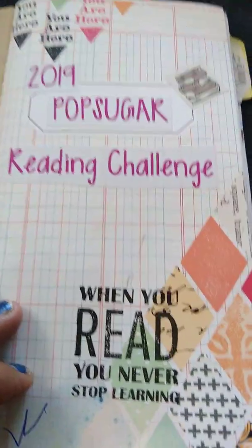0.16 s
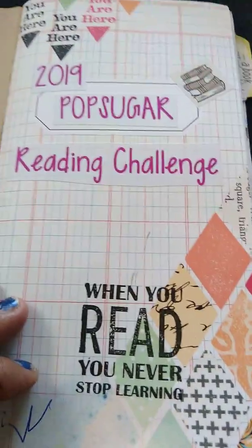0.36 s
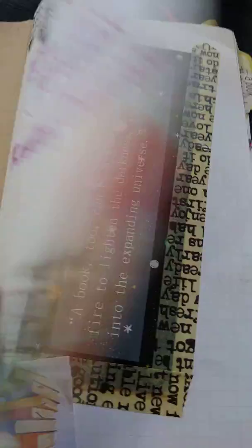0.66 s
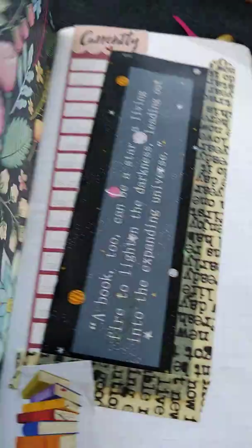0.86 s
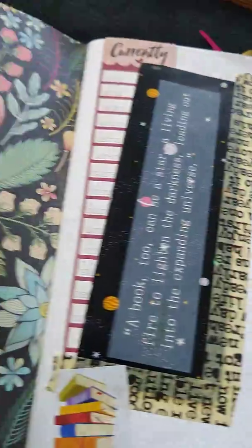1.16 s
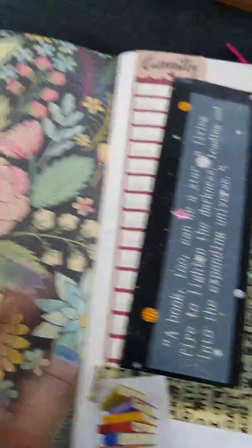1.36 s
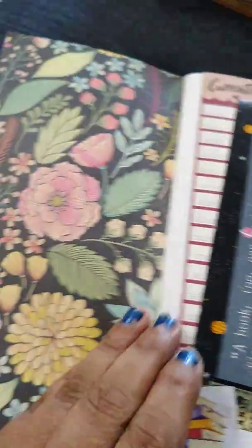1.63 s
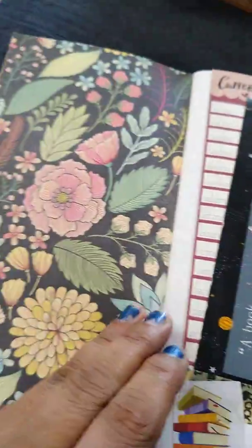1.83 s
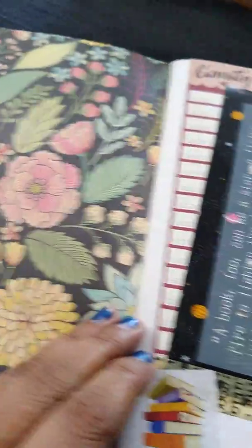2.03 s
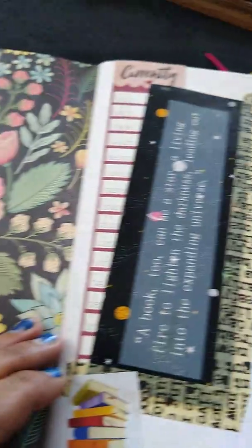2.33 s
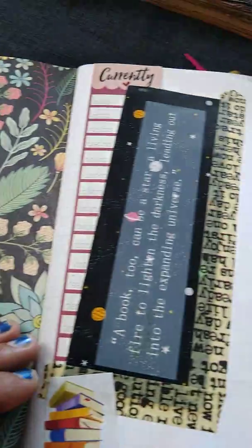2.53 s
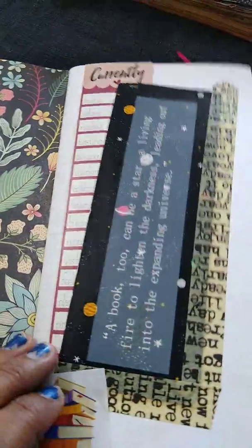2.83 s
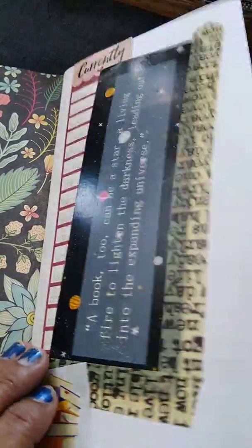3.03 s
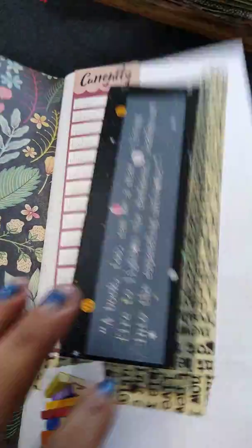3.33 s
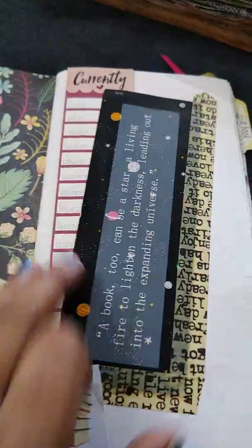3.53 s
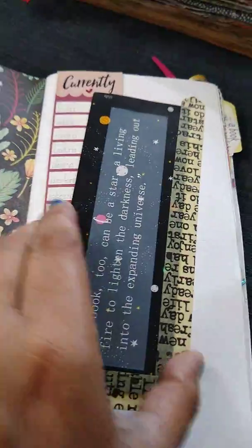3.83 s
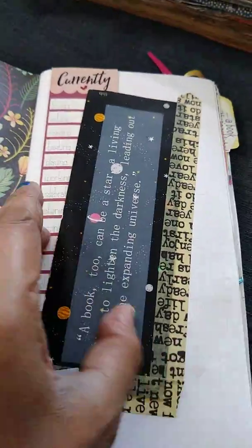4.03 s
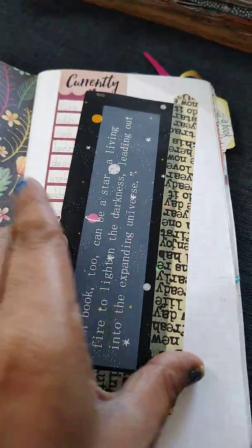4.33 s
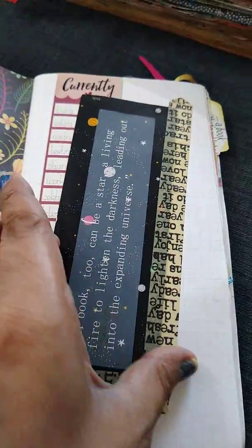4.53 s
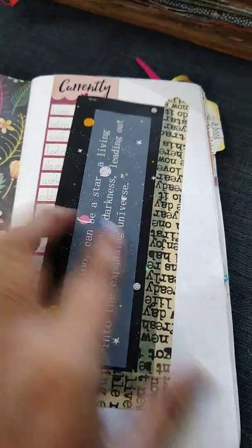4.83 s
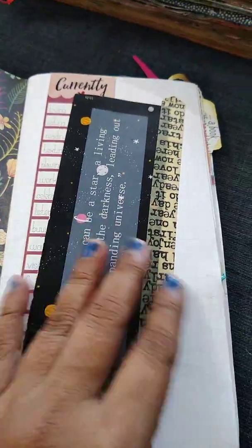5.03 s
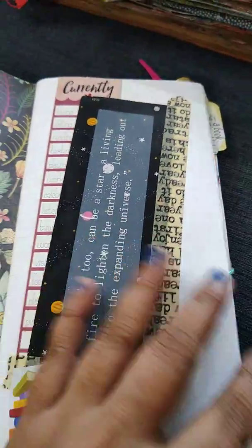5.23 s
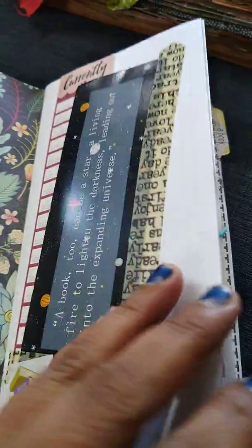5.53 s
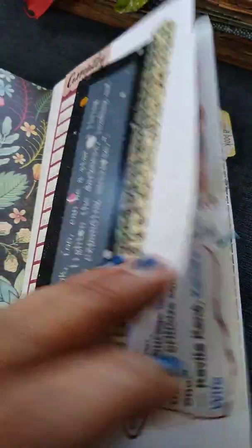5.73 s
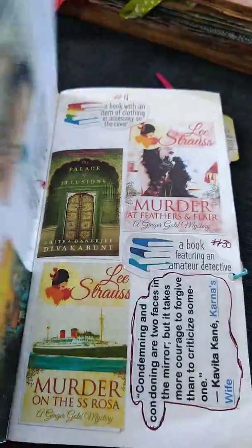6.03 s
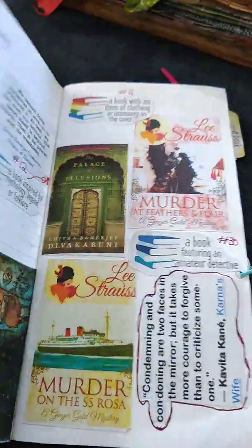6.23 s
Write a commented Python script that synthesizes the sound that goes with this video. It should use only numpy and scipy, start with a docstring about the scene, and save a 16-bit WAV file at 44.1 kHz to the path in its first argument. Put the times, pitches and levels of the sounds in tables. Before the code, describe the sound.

A hand opens and leafs through a heavy paper book in a quiet room. First come grainy scrapes, flexing sheets and several loud page slaps; then near stillness with distant hoarse bird calls. More rustling follows, with crisp edge snaps and stuttering palm friction, then airy, hissing slides and a final page turn. Recorded very close, with short reflections, low rumble and steady faint hiss; the two channels are opposite in polarity.

```python
"""A thick paper journal is opened and leafed through by hand, close to a camera in a quiet room.
Pages slide with a grainy hiss of friction noise, flex, and flap down: scrape, slap and ringing stack.
Skin and page edges rub in stick-slip noise, and a palm smooths the sheet in small jerks.
A hoarse bird, a gliding tone with a noisy edge, calls faintly far away over low rumble and steady hiss.
The two microphone channels have opposite polarity."""
import sys
import numpy as np
from scipy import signal
from scipy.fft import rfft, irfft, next_fast_len
from scipy.io import wavfile
from scipy.ndimage import uniform_filter1d, map_coordinates

SR = 44100
rng = np.random.default_rng(int(sys.argv[2]) if len(sys.argv) > 2 else 0)


def transcribe(signal):
    """Save signal, clipped to [-1, 1], as a 16-bit WAV file at the path in sys.argv[1]."""
    frames = np.atleast_2d(signal).T
    limited = np.clip(frames, -1, 1)
    pcm = np.round(limited * 32767).astype(np.int16)
    wavfile.write(sys.argv[1], SR, pcm)


N = 281269
T = np.arange(N) / SR  # seconds
# All levels in the tables are relative: the mix and the microphone come after them.


def amp(db):
    """Decibels to gain."""
    return 10 ** (np.asarray(db) / 20)


def unit(x):
    """Scale to rms 1."""
    return x / np.sqrt(np.mean(x ** 2) + 1e-20)


def along(points, hz):
    """Read (Hz, value) points on a log frequency axis."""
    f, v = np.transpose(points)
    return np.interp(np.log(hz + 1), np.log(f + 1), v)


def wobble(rate):
    """A smooth random curve, rate knots a second."""
    knots = rng.standard_normal(int(N * rate / SR) + 4)
    return map_coordinates(knots, [T * rate])


def filtered(x, response):
    """x times a complex response of frequency."""
    n = x.shape[-1]
    m = next_fast_len(n + 4096)
    return irfft(rfft(x, m) * response(np.fft.rfftfreq(m, 1 / SR)), m)[..., :n]


def coloured(x, spectrum):
    """x shaped by (Hz, dB) points, at rms 1."""
    return unit(filtered(x, lambda hz: amp(along(spectrum, hz))))


def halves(texture):
    """Near and far sides share a texture but no simultaneous detail: one is shifted by half the length."""
    return np.array([texture, np.roll(texture, N // 2)])


def stroke(start, rise, hold, decay):
    """One movement of the hand: it gathers speed, keeps it, and dies away to a tenth in each decay time."""
    attack = np.sin(np.pi / 2 * np.clip((T - start) / rise, 0, 1)) ** 1.6
    return attack * amp(-20 * np.maximum(T - start - rise - hold, 0) / decay)


SNAGS_PER_S, SNAG_DB = 46, 2.5  # typical snagging rate of the sheet, and the swell before it frees itself


def friction(spectrum, rate, grain_share, spread_db, flutter_db):
    """Fibres catch and let go, about rate times a second, over a bed of countless smaller slips."""
    sizes = amp(spread_db * np.minimum(rng.exponential(size=N), 4))
    slips = (rng.random(N) < rate / SR) * rng.choice([-1, 1], N) * sizes
    bed = rng.standard_normal(N)
    drive = np.sqrt(grain_share) * unit(slips) + np.sqrt(1 - grain_share) * bed
    # drag builds up, then suddenly lets go
    snag = np.cumsum(SNAGS_PER_S * np.exp(0.75 * wobble(40))) / SR % 1
    # the hand never presses evenly
    pressure_db = flutter_db * wobble(70) + wobble(22.05) + SNAG_DB * snag ** 2
    return coloured(drive * amp(pressure_db), spectrum)


def bending(x, depth_db, size):
    """As a sheet bends, its resonances drift: patches of gain in time and frequency, size bins high."""
    z = signal.stft(x, nperseg=512)[2]
    field = uniform_filter1d(rng.standard_normal(z.shape), size=size, axis=0)
    field = uniform_filter1d(field, size=18, axis=1)
    return unit(signal.istft(z * amp(depth_db * unit(field)), nperseg=512)[1][:N])


# level of the room's rumble: time_s, level_db
RUMBLE_LEVEL = [(0, -55), (.25, -64), (.6, -51), (1.8, -56.5), (2.45, -51.5), (2.8, -59), (4.3, -51.5),
                (4.55, -46), (4.8, -49), (5.7, -54.5), (6.15, -55), (6.38, -48)]
# spectra of the rumble and of the steady hiss: pitch_hz, level_db (per Hz)
RUMBLE_SPECTRUM = [(20, -24), (50, -10.5), (85, 3), (135, 3.5), (220, -12), (420, -32.5), (1000, -48),
                   (3000, -78.5)]
HISS_SPECTRUM = [(60, -12), (220, -18.5), (420, -21.5), (850, -25), (1700, -28.5), (2900, -30.5),
                 (6000, -36.5), (15500, -39.5)]


def room_tone():
    """Low rumble of the room, wandering a little, with a faint steady hiss, from the two sides."""
    level_db = np.interp(T, *np.transpose(RUMBLE_LEVEL)) + 2.2 * wobble(9)
    rumble = amp(level_db) * halves(coloured(rng.standard_normal(N), RUMBLE_SPECTRUM))
    hiss = halves(coloured(rng.standard_normal(N), HISS_SPECTRUM))
    return rumble + amp(-61.5) * hiss


# calls of the far bird: start_s, length_s, first_pitch_hz, last_pitch_hz, level_db, hoarseness (0-1)
BIRD_CALLS = [(1.9, 0.34, 1680, 1495, -52.5, 0.65), (2.54, 0.3, 1566, 1495, -48.5, 0.54),
              (4.103, 0.39, 1517, 1544, -44.5, 0.65), (4.493, 0.25, 1560, 1573, -49, 0.17)]
SETTLE_S = 0.11  # time constant of the slide to the last pitch
WAVER_HZ, RASP_HZ = 24.6, 126.5  # random pitch waver, and approximate half width of the rasp


def bird():
    """Each far call is a thin whistle with a hoarse edge, sliding from its first pitch towards its last."""
    out = np.zeros(N)
    for start, length, first_hz, last_hz, db, hoarse in BIRD_CALLS:
        t = np.maximum(T - start, 0)
        pitch = last_hz + (first_hz - last_hz) * np.exp(-t / SETTLE_S) + WAVER_HZ * wobble(60)
        phase = 2 * np.pi * np.cumsum(pitch) / SR
        whistle = unit(np.sin(phase))
        rasp = unit(wobble(2 * RASP_HZ) * np.sin(phase) + wobble(2 * RASP_HZ) * np.cos(phase))
        swell = np.abs(np.sin(np.pi * np.minimum(t / length, 1) ** 0.78)) ** 1.4
        out += amp(db) * swell * (np.sqrt(1 - hoarse) * whistle + np.sqrt(hoarse) * rasp)
    return out


# puffs of air from a moving sheet: start_s, rise_s, hold_s, decay_s, level_db
PUFFS = [(0.682, 0.084, 0.019, 0.11, -38.5), (0.86, 0.06, 0.03, 0.18, -40.5),
         (3.167, 0.072, 0.15, 0.1, -54.5), (3.449, 0.033, 0.069, 0.11, -37.5),
         (3.672, 0.017, 0.025, 0.1, -44.5), (4.414, 0.026, 0.09, 0.21, -40.5),
         (4.919, 0.032, 0.02, 0.068, -50), (6.115, 0.034, 0.2, 0.1, -56)]
# spectrum of a puff: pitch_hz, level_db (per Hz)
PUFF_SPECTRUM = [(40, -21.5), (90, -2), (140, 5.5), (200, -2), (300, -21.5), (700, -43.5), (2000, -90)]


def wafts():
    """A moving sheet fans the air: a soft, low puff."""
    push = sum(amp(db) * stroke(start, rise, hold, decay) for start, rise, hold, decay, db in PUFFS)
    return push * coloured(rng.standard_normal(N), PUFF_SPECTRUM)


# fingertips and page corners chattering over the paper:
# start_s, length_s, first_pitch_hz, last_pitch_hz, level_db, width_hz
CHATTERS = [(.3, 0.24, 1105, 1050, -44.5, 140), (.88, 0.14, 250, 487, -37.5, 83.4),
            (1.56, 0.18, 1282, 1314, -45, 47), (3.035, 0.034, 1400, 1370, -58.5, 234),
            (3.07, 0.1, 4280, 4410, -54, 494), (4.2, 0.09, 538, 492, -52.5, 66),
            (4.24, 0.098, 1075, 1100, -46, 188), (4.772, 0.12, 2370, 2300, -41.5, 253),
            (4.78, 0.073, 1455, 1400, -47, 242), (4.9, 0.11, 1173, 1008, -50.5, 148),
            (5.03, 0.1, 872, 825, -44, 160), (6.02, 0.15, 824, 600, -57.5, 128),
            (6.28, 0.11, 1600, 1800, -55, 203)]


def squeaks():
    """A hard drag sticks and slips at a nearly steady rate: rasping tones that swell, glide and fade."""
    out = np.zeros(N + SR)
    waver = wobble(30)
    for start, length, first_hz, last_hz, db, width_hz in CHATTERS:
        first = round(start * SR)
        u = np.linspace(0, 1, int(length * SR))
        phase = 2 * np.pi * np.cumsum(first_hz + (last_hz - first_hz) * u) / SR
        knots = rng.standard_normal((2, 1024))
        real, imag = (map_coordinates(k, [u * length * 2 * width_hz], mode="mirror") for k in knots)
        tone = unit(real * np.sin(phase) + imag * np.cos(phase))
        swell = np.abs(np.sin(np.pi * u ** 0.65)) ** 1.6  # rises faster than it falls
        swell = swell * amp(2.7 * np.take(waver, first + np.arange(len(u)), mode="wrap"))
        out[first:][:len(u)] += amp(db) * swell * tone
    return out[:N]


# the hand presses and rubs a page: start_s, rise_s, hold_s, decay_s, rub_level_db, flex_level_db,
# edge_share (stiff paper edge against soft skin, 0-1)
HAND_RUBS = [(0.278, 0.031, 0.077, 0.09, -35.5, -28.5, 0.23), (0.568, 0.016, 0.026, 0.22, -43, -40.5, 0.5),
             (0.658, 0.093, 0.029, 0.088, -25.5, -27, 0.72), (0.865, 0.12, 0.019, 0.15, -45, -36.5, 0),
             (1.137, 0.064, 0.092, 0.29, -35.5, -29.5, 0.75), (1.345, 0.13, 0.13, 0.2, -39, -39.5, 0.55),
             (2.933, 0.022, 0.0085, 0.092, -53.5, -66, 0.64), (3.04, 0.034, 0.043, 0.034, -50, -59, 0.93),
             (3.18, 0.028, 0.025, 0.29, -42, -56, 0.7), (3.365, 0.04, 0.039, 0.05, -40.5, -60, 0.8),
             (3.449, 0.014, 0.089, 0.087, -34, -38.5, 0.63), (3.572, 0.037, 0.0093, 0.055, -26, -57, 0.5),
             (3.652, 0.011, 0.061, 0.16, -33, -47.5, 0.84), (3.937, 0.08, 0.012, 0.083, -33.5, -32.5, 0),
             (4.043, 0.015, 0.009, 0.17, -42.5, -53, 0), (4.33, 0.041, 0.037, 0.11, -31, -56, 0.04),
             (4.446, 0.016, 0.064, 0.052, -42.5, -43, 0.02), (4.765, 0.011, 0.016, 0.24, -46.5, -59, 0.98),
             (4.895, 0.023, 0.25, 0.15, -53, -73, 0.2), (5.163, 0.038, 0.041, 0.064, -49, -53.5, 0.9),
             (6.037, 0.018, 0.1, 0.14, -57.5, -58.5, 0.14)]
# spectra of skin on paper, page edge on paper, and flexing sheet: pitch_hz, level_db (per Hz)
SKIN_SPECTRUM = [(250, -63.5), (500, -10.5), (750, 2.5), (1050, 4), (1450, -3.5), (1900, 0), (2700, -41.5),
                 (4000, -88.5), (8000, -101.5)]
EDGE_SPECTRUM = [(400, -75), (800, -47), (1300, 11.5), (1750, 19.5), (2400, 16.5), (3000, 4.5), (4500, -29),
                 (9000, -77.5)]
FLEX_SPECTRUM = [(30, -39.5), (70, -13.5), (120, -11), (190, 1), (330, -4), (520, -5.5), (750, -8.5),
                 (1500, -27.5), (3000, -97)]


def rubbing():
    """Skin and page edges stick and slip on the paper, and the whole sheet flexes beneath them."""
    skin_power, edge_power, flex_power = np.zeros((3, N))
    for start, rise, hold, decay, rub_db, flex_db, edge in HAND_RUBS:
        power = stroke(start, rise, hold, decay) ** 2
        skin_power += (1 - edge) * amp(rub_db) ** 2 * power
        edge_power += edge * amp(rub_db) ** 2 * power
        flex_power += amp(flex_db) ** 2 * power
    skin = friction(SKIN_SPECTRUM, rate=340, grain_share=0.57, spread_db=2.0, flutter_db=1.5)
    skin = bending(skin, depth_db=5.5, size=2)
    scrape = friction(EDGE_SPECTRUM, rate=370, grain_share=0.82, spread_db=0.0, flutter_db=3.0)
    scrape = bending(scrape, depth_db=5.5, size=3)
    flex = friction(FLEX_SPECTRUM, rate=260, grain_share=0.037, spread_db=3.5, flutter_db=4.5)
    rub = np.sqrt(skin_power) * halves(skin) + np.sqrt(edge_power) * halves(scrape)
    return amp(-4.0) * rub + amp(-5.5) * np.sqrt(flex_power) * halves(flex)


# spectrum of the clicks of a buckling sheet: pitch_hz, level_db (per Hz)
BUCKLE_SPECTRUM = [(700, -48), (1500, -19), (2600, -30), (4200, 13), (6000, 4), (9000, 12), (15000, 4.5)]


def crinkles():
    """Sparse tiny buckles click in the near half of the sheet; a few stand out."""
    sizes = amp(2.5 * np.minimum(rng.exponential(size=N), 3))
    buckles = (rng.random(N) < 130 / SR) * rng.choice([-1, 1], N) * sizes  # about 130 a second
    return np.outer([1, 0], amp(-9.5) * coloured(buckles, BUCKLE_SPECTRUM))


def air_gap(x, gap_hz, echo):
    """Hiss bounces between the lifted sheet and the page below, and rings at gap_hz and its multiples."""
    def response(hz):
        back = min(echo, 0.8) / (1 + (hz / 11000) ** 4)
        return np.sqrt(1 - back ** 2) / (1 - back * np.exp(-2j * np.pi * hz / gap_hz))
    return filtered(x, response)


# a sheet or palm slides over paper: start_s, rise_s, hold_s, decay_s, level_db,
# brightness_db (sheen against low hiss), top_hz (of the hiss), gap_pitch_hz, gap_echo (0-1, at most 0.8 used)
PAGE_SLIDES = [(0.567, 0.0029, 0.044, 0.13, -42, -17, 6960, 2980, .2),
               (0.619, 0.13, 0.03, 0.056, -25.5, -12, 12500, 2950, .25),
               (0.75, 0.057, 0.1, 0.11, -40.5, -3, 12200, 3070, 0.6),
               (0.897, 0.1, 0.067, 0.058, -34.5, 1.5, 18000, 3840, 0.16),
               (1.075, 0.1, 0.042, 0.14, -33.5, -4.5, 14000, 3400, 0),
               (1.233, 0.02, 0.0032, 0.016, -40, -8, 15900, 2000, 0),
               (1.327, 0.082, 0.074, 0.05, -36.5, -8.5, 18600, 3650, 0.04),
               (1.492, 0.045, 0.1, 0.1, -39.5, -0.5, 17800, 2680, 0.14),
               (2.925, 0.005, 0.011, 0.075, -38.5, 2.5, 15000, 3030, 0.26),
               (3.006, 0.093, 0.011, 0.11, -52, -13, 9000, 2180, 0.34),
               (3.178, 0.029, 0.14, 0.3, -48.5, -3.5, 13400, 2630, .3),
               (3.346, 0.04, 0.26, 0.041, -37.5, -10.5, 13400, 2470, 0.18),
               (3.437, 0.094, 0.017, 0.034, -37, 2, 14000, 2300, 0),
               (3.644, 0.043, 0.037, 0.13, -31.5, 3.5, 18000, 3100, 0.24),
               (3.735, 0.033, 0.021, 0.12, -36.5, -10.5, 18000, 3900, 0.2),
               (3.95, 0.048, 0.027, 0.022, -26.5, -9, 16000, 2280, 0.02),
               (4.025, 0.028, 0.031, 0.075, -39.5, -5.5, 14150, 2520, 0.04),
               (4.142, 0.038, 0.018, 0.031, -50.5, -4, 12100, 4140, 0.7),
               (4.218, 0.11, 0.011, 0.072, -36.5, 4, 18100, 3850, 0.27),
               (4.381, 0.011, 0.026, 0.076, -41, -0.5, 16000, 2260, 0.4),
               (4.762, 0.034, 0.03, 0.11, -53, 2.5, 12800, 2120, 0.6),
               (4.899, 0.046, 0.09, 0.2, -32.5, 9, 20000, 2370, 0.06),
               (5.113, 0.11, 0.015, 0.064, -37, 7, 18100, 2780, 0.48),
               (5.278, 0.054, 0.014, 0.044, -48.5, 18.5, 14000, 2800, 0.64),
               (5.375, 0.018, 0.035, 0.15, -47, 3, 9400, 2850, 0.83),
               (5.478, 0.081, 0.034, 0.073, -51.5, 5.5, 9100, 2700, 0.8),
               (5.599, 0.027, 0.011, 0.12, -43.5, 2, 11000, 2900, 0.36),
               (5.681, 0.015, 0.0058, 0.013, -47.5, 11, 10850, 2880, .3),
               (5.763, 0.02, 0.029, 0.28, -55.5, -2, 18300, 3300, .3),
               (5.872, 0.039, 0.014, 0.07, -45, -15, 7000, 2180, 0.54),
               (5.913, 0.15, 0.062, 0.15, -34.5, -4.5, 10800, 3250, 0.27),
               (6.251, 0.088, 0.071, 0.1, -47, -6, 10300, 3900, 0.52)]
# spectra of the heavier and the lighter sliding hiss: pitch_hz, level_db (per Hz)
SLIDE_SPECTRUM = [(1200, -28), (1850, -12), (2400, 9.5), (2900, 9.5), (3600, 9.5), (4900, 7.5), (6200, 2),
                  (7400, 4), (9000, -2), (15000, -35.5)]
SHEEN_SPECTRUM = [(2000, -38), (3500, -17.5), (5000, -9.5), (6500, -0.5), (8000, -1.5), (9800, 4),
                  (11800, 1), (13500, -1), (15500, -5)]


def sliding():
    """Sheet drags over sheet; a lighter, faster touch moves the hiss upward, a heavier one buckles the paper."""
    low = friction(SLIDE_SPECTRUM, rate=860, grain_share=0.26, spread_db=3.5, flutter_db=2.0)
    low = bending(low, depth_db=6.5, size=2)
    high = friction(SHEEN_SPECTRUM, rate=4600, grain_share=0.75, spread_db=3.0, flutter_db=1.0)
    high = bending(high, depth_db=4.5, size=2)
    low = amp(-3.0) * (halves(low) + crinkles())
    high = halves(high) + 0.54 * crinkles()
    out = np.zeros((2, N))
    for start, rise, hold, decay, db, bright_db, top_hz, gap_hz, echo in PAGE_SLIDES:
        speed = stroke(start, rise, hold, decay)
        on = speed > .001
        sheen_share = 1 / (1 + amp(-bright_db) ** 2)
        hiss = np.sqrt(1 - sheen_share) * low[:, on] + np.sqrt(sheen_share) * high[:, on]
        soften = signal.butter(3, top_hz, fs=SR, output="sos")
        hiss = air_gap(signal.sosfilt(soften, hiss), gap_hz, echo)
        out[:, on] += amp(db) * speed[on] * hiss
    return out


# a page flaps down on the stack:
# time_s, thump_level_db, slap_level_db, crack_level_db, contact_s, slap_pitch_hz, thump_pitch_hz
PAGE_FLAPS = [(0.577, -30.5, -33.5, -29.5, 0.00073, 1100, 332), (1.128, -22, -30, -43, 0.00064, 600, 295),
              (1.144, -16, -29, -28, 0.0024, 800, 241), (1.156, -19, -40, -47.5, 0.0014, 910, 130),
              (1.2535, -27, -11, -14.5, 0.0014, 1860, 400), (1.256, -21.5, -11, -23, 0.00051, 1470, 500),
              (1.263, -19, -40, -41, 0.00055, 1400, 151), (1.2885, -12, -23.5, -36.5, 0.00021, 1160, 298),
              (1.291, -23, -11, -42.5, 0.00095, 1480, 704), (1.311, -38, -28, -21.5, 0.0014, 1900, 400),
              (1.316, -26.5, -21.5, -29.5, 0.0014, 1670, 130), (1.47, -38, -16.5, -9.5, 0.00036, 1960, 450),
              (1.475, -15.5, -24, -41, 0.00043, 1240, 480), (1.484, -25, -26, -23, 0.00081, 1110, 500),
              (1.495, -18, -22, -30, 0.0006, 1110, 494), (1.641, -28, -23, -20, 0.00026, 1410, 397),
              (1.6455, -19.5, -38, -42, 0.00063, 855, 380), (1.651, -23, -29.5, -42, 0.0006, 1000, 556),
              (3.495, -30.5, -26.5, -39, 0.0013, 1680, 327), (3.538, -34, -29, -17, 0.00073, 1600, 340),
              (3.673, -59, -25, -26, 0.004, 1230, 393), (3.716, -47, -33, -26, 0.004, 1440, 396),
              (4.011, -31.5, -30, -20.5, 0.0015, 1250, 400), (4.943, -58, -39, -28, 0.00068, 1010, 400),
              (5.055, -50, -43, -23, 0.0042, 1020, 400), (5.642, -41, -45.5, -22, 0.0011, 1200, 400),
              (6.133, -41, -40, -15, 0.0026, 1990, 403)]
# a page edge flicks free: time_s, crack_level_db, contact_s
EDGE_FLICKS = [(2.933, -27, 0.00097), (3.198, -55, .001), (3.327, -23, 0.0027), (3.367, -37, .0007),
               (3.376, -36, .0007), (3.439, -24.5, 0.00057), (3.455, -29, 0.00057), (3.523, -27, .0005),
               (3.571, -26, 0.0007), (3.682, -24, 0.00055), (3.721, -23, 0.00034), (3.835, -30, 0.00074),
               (3.873, -33, 0.001), (3.915, -54, 0.0007), (4.007, -17, .0005), (4.4, -28, 0.0018),
               (5.535, -47, 0.002), (5.61, -30, 0.0047), (5.782, -33.5, 0.001), (5.796, -24.5, 0.0031)]
# the palm sticks and slips as it smooths the page: time_s, level_db
PALM_SLIPS = [(3.608, -30), (3.622, -30.5), (3.965, -29.5), (4.359, -25.5), (4.373, -23), (4.379, -21.5),
              (4.407, -22), (4.418, -36), (4.429, -25.5), (4.4352, -18.5), (4.439, -19.5), (4.4437, -16)]
FLICK_HZ, SLIP_HZ = 2050, 1020  # the sheet's answer to a flick, and its pitch under the palm
LIGHT_THUMP_HZ = 367  # the stack's answer to a flick or slip
FLICK_THUMP_DB, FLICK_SLAP_DB = -35.5, -16  # relative to the crack
SLIP_THUMP_DB, SLIP_CRACK_DB = -21.5, -32.5  # relative to the slip
SLIP_S = 0.0006  # contact time of a slip


def contacts():
    """Flaps, flicks and slips all sound the same sheet and stack, in different proportions."""
    flicks = [(s, db + FLICK_THUMP_DB, db + FLICK_SLAP_DB, db, contact, FLICK_HZ, LIGHT_THUMP_HZ)
              for s, db, contact in EDGE_FLICKS]
    slips = [(s, db + SLIP_THUMP_DB, db, db + SLIP_CRACK_DB, SLIP_S, SLIP_HZ, LIGHT_THUMP_HZ)
             for s, db in PALM_SLIPS]
    return list(PAGE_FLAPS) + flicks + slips


def burst(noise, t, width, lead_db, lead_t60, tail_db, tail_t60):
    """A contact of the given width around t = 0: a scrape leads up to it and a short tail follows."""
    touch = np.exp(-.5 * (t / width) ** 2)
    skirt = amp(np.where(t < 0, lead_db + 60 * t / lead_t60, tail_db - 60 * t / tail_t60))
    shape = np.maximum(touch, skirt)
    return unit(noise * shape) * np.sqrt(np.mean(shape ** 2))


# modes of the page stack and cover: pitch_hz, level_db, t60_s (each strike varies pitch and level a little)
STACK_MODES = [(144, 4.5, 0.14), (180.2, 2.5, 0.12), (266, 3, 0.037), (342, -0.5, 0.053),
               (444.6, -3, 0.079), (569, 3.5, 0.034), (737, -0.5, 0.033)]


def stack_ring(t, width, thump_hz):
    """One push starts the stack's damped modes together; those nearest thump_hz are favoured."""
    after = np.maximum(t, 0)
    ring = 0
    for hz, db, t60 in STACK_MODES:
        nearness = 1 / np.hypot(1, 1.7 * (hz / thump_hz - thump_hz / hz))
        strength = amp(db + 1.5 * rng.normal()) * nearness
        pitch = hz * np.exp(0.078 * rng.normal())
        ring += strength * amp(-60 * after / t60) * np.sin(2 * np.pi * pitch * after)
    ring *= 1 - np.exp(-after / (0.92 * width))
    ring = filtered(ring, lambda hz: (1j * hz / (1j * hz + 68)) ** 3)  # the thump carries little deep bass
    return ring / np.sqrt(np.mean(ring[(t > 0) & (t < .0125)] ** 2))


# spectrum of the crack of a page edge: pitch_hz, level_db (per Hz)
CRACK_SPECTRUM = [(900, -33), (2000, 2.5), (3000, 0.5), (4500, 6.5), (6200, 7.5), (8500, 6), (11000, 5),
                  (15500, -0.5)]


def flaps():
    """The page edge scrapes and snaps free, the sheet slaps the air out from under it, the stack thumps."""
    out = np.zeros(N + SR)
    lead = SR // 16
    t = np.arange(-lead, SR // 6) / SR
    for s, thump_db, slap_db, crack_db, contact, slap_hz, thump_hz in contacts():
        white = rng.standard_normal((2, len(t)))
        width = max(contact, .0003)
        brief_db = 5 * np.log10(1 + (0.0012 / width) ** 2)  # a brief contact has a higher peak
        crack = burst(coloured(white[0], CRACK_SPECTRUM), t, width * 1.56, lead_db=-9.5,
                      lead_t60=0.017 + 12 * width, tail_db=-19.0, tail_t60=0.017)
        resonance = lambda hz: 1 / (1 + 1j * 1.52 * (hz / slap_hz - slap_hz / (hz + 1))) ** 2
        sheet = unit(filtered(white[1], resonance))
        # the slap follows the crack by a millisecond
        slap = burst(sheet, t - .001, width * 1.75, lead_db=-28.5,
                     lead_t60=0.056, tail_db=-11.5, tail_t60=0.083)
        hit = amp(crack_db + brief_db - 9.5) * crack
        hit += amp(slap_db + brief_db - 3.5) * slap
        hit += amp(thump_db - 2.5) * stack_ring(t, width, thump_hz)
        out[round(s * SR) - lead:][:len(t)] += hit
    return out[:N]


# reflections off the desk and walls: pitch_hz, level_db
ECHO_LEVEL = [(100, -12), (1000, -4), (4000, -16), (15000, -13.5)]
# their decay: pitch_hz, t60_s
ECHO_DECAY = [(150, 0.18), (1000, 0.026), (4000, 0.087), (14000, 0.13)]


def reflections(x):
    """The desk and walls answer briefly, as decaying noise; the lows last longest, the mids die first."""
    hz, t, z = signal.stft(rng.standard_normal(SR // 4), SR, nperseg=128)
    fade = amp(-60 * t / along(ECHO_DECAY, hz)[:, None])
    even = z * fade / np.linalg.norm(fade, axis=1, keepdims=True)
    tail = signal.istft(even, SR, nperseg=128)[1]
    delayed = np.pad(tail / np.linalg.norm(tail), (SR // 800, 0))
    wet = signal.fftconvolve(x, delayed)[:N]
    return filtered(wet, lambda f: amp(along(ECHO_LEVEL, f)))


# extra phase lag of the left channel, strongest in the bass: pitch_hz, lag_rad
LEFT_LAG = [(60, 0.55), (300, 0.24), (750, 0.32), (1300, 0.31)]


def ports(x, lag_ms):
    """Sound reaches the left port lag_ms later than the right, whose polarity is reversed."""
    def pair(hz):
        turn = (2 * np.pi * hz * lag_ms / 1000 + along(LEFT_LAG, hz)) / 2
        return np.array([np.exp(-1j * turn), -np.exp(1j * turn)])
    return filtered(x, pair)


# colour of the far side, heard from the other side: pitch_hz, level_db
FAR_SIDE = [(100, -25), (500, -12), (1200, -2), (2000, -18.5), (4000, -4), (15000, 1)]
# left port against right port, shared equally between them: pitch_hz, level_db
PORT_TILT = [(60, -2), (250, -5), (600, -4.5), (1100, -3.5), (1600, 2.5), (2300, 3.5), (2600, -3.5),
             (3500, -2.5), (4700, -4.5), (5200, 1.1), (6500, -6.5), (9000, -4.5), (14000, -1)]


def scene():
    """Sheet and room sound from two sides; the far side and reflections reach the ports in opposite order."""
    lag_ms = .405
    near, far = sliding() + rubbing() + room_tone()
    hits = flaps()
    near = near + squeaks() + hits + wafts() + bird()
    far = filtered(far, lambda hz: amp(along(FAR_SIDE, hz))) + reflections(hits)
    pair = ports(near, lag_ms) + ports(far, -lag_ms)
    return amp(-2.5) * filtered(pair, lambda hz: amp(np.outer([.5, -.5], along(PORT_TILT, hz))))


def record(dry):
    """The camera thins the deepest bass and keeps almost nothing above its band limit."""
    bass_hz, top_hz = 45, 15600
    low_cut = lambda hz: hz ** 2 / np.sqrt(hz ** 4 + bass_hz ** 4)
    high_cut = lambda hz: 1 / np.sqrt(1 + np.minimum(hz / top_hz, 2) ** 320)
    return filtered(dry, lambda hz: low_cut(hz) * high_cut(hz))


dry = scene()
out = record(dry)
transcribe(out)
```